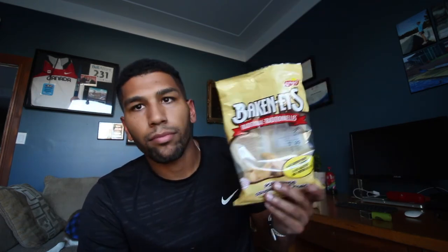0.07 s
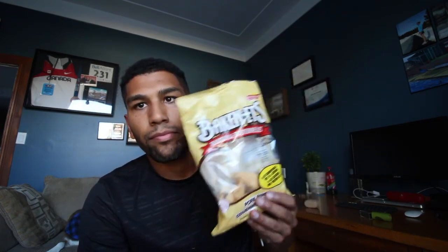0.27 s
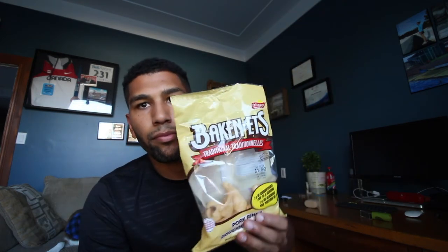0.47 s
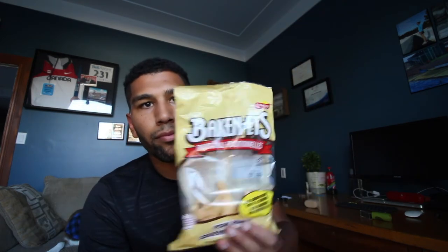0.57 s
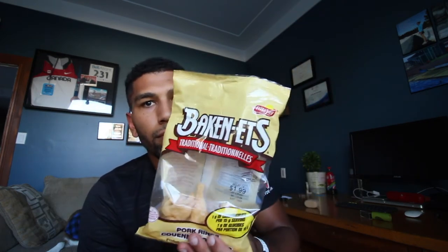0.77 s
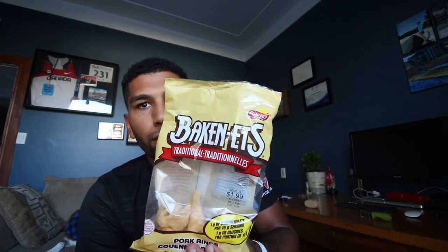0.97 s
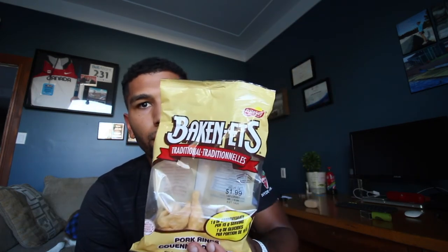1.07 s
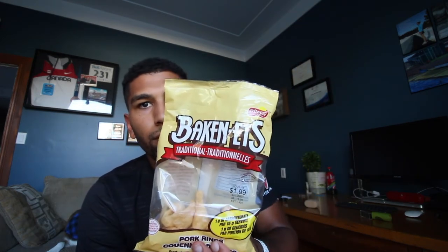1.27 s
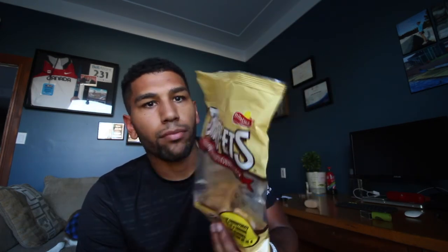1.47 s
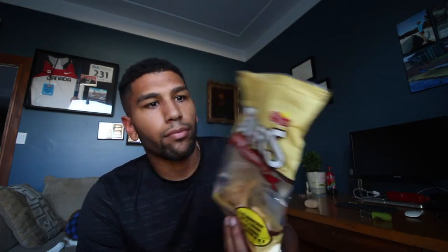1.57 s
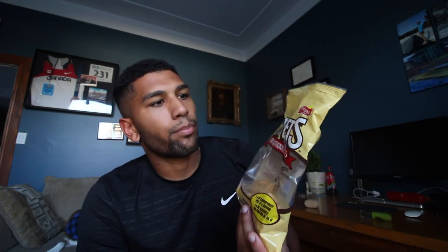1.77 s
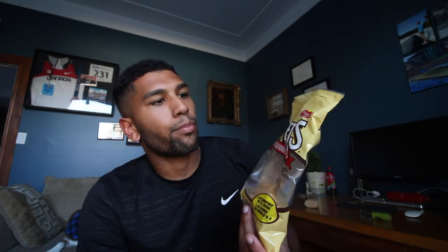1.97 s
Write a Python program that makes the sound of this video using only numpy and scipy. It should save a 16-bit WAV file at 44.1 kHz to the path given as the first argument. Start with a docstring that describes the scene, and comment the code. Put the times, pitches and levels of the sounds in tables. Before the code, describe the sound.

A plastic snack bag crinkles close by: irregular bright snaps and fine crackle from 0 to 0.7 s, strongest near 0.05, 0.27 and 0.5 s. A few sparse ticks follow, with a clear one at 0.94 s, then near quiet. From 1.39 s a dense crackling burst peaks around 1.5 s, with light contents shifting, continuing in snaps until 1.9 s. Short room reflections, faint low hum and hiss.

```python
"""Creases in a plastic snack bag snap over as it turns in the hand, near a camera in a quiet room. Each snap
sums a damped ring, a sharp bright crack, a dull thud of air and a flutter of noise. Scattered tiny pings make
the fine crackle, its finest grain and the shifting contents; three low pings are pieces dropping inside.
Near surfaces and a wall return delayed, duller snaps; decaying noise tails give the room's answer.
Under it lie a low hum with a narrow drone and the microphone's hiss, all shaped from noise."""
import sys
import numpy as np
from scipy import signal
from scipy.fft import rfft, irfft, next_fast_len
from scipy.io import wavfile

SR = 44100
rng = np.random.default_rng(int(sys.argv[2]) if len(sys.argv) > 2 else 0)


def to_wav(s):
    """Save 16-bit WAV."""
    ch = np.atleast_2d(s).T  # columns
    pcm = np.round(np.clip(ch, -1, 1) * 32767)  # PCM
    wavfile.write(sys.argv[1], SR, pcm.astype(np.int16))


N = 88288  # length of the scene in samples


def amp(db):
    """Turns dB into a pressure gain."""
    return 10 ** (np.asarray(db) / 20)


def unit(x):
    """Scales a sound to rms 1."""
    return x / np.sqrt(np.mean(x ** 2) + 1e-20)


def along(points, hz):
    """Reads (f/Hz, value) points on a logarithmic frequency axis."""
    f, value = np.transpose(points)
    return np.interp(np.log(hz + 1), np.log(f + 1), value)


def filtered(x, response):
    """Multiplies the spectrum of x by a response of frequency."""
    length = next_fast_len(N + SR // 2)
    hz = np.fft.rfftfreq(length, 1 / SR)
    return irfft(rfft(x, length) * response(hz), length)[..., :N]


def placed(start_s, rows):
    """Lays down short sounds, one per row, at their start times."""
    first = np.round(start_s * SR).astype(int)
    at = first[:, None] + np.arange(rows.shape[1])
    return np.bincount(at.ravel(), rows.ravel(), N + SR)[:N]


def pings(db, hz, cycles, size=512):
    """Damped sines that swell softly to an envelope peak of db and die within some cycles."""
    turns = hz[:, None] * np.arange(size) / SR
    age = turns / (np.reshape(cycles, (-1, 1)) / 5)
    envelope = (np.e * age / 2) ** 2 * np.exp(-age)  # peaks at 1 when age is 2
    return amp(db)[:, None] * envelope * np.sin(2 * np.pi * turns)


def shivers(count, life_s):
    """Rows of noise that start at once and die away, each of energy 1."""
    age = np.arange(512) / SR / life_s
    puff = rng.standard_normal((count, 512)) * np.sqrt(age) * np.exp(-age)
    return puff / np.linalg.norm(puff, axis=1, keepdims=True)


def band(db, rows, low_hz, top_hz):
    sos = signal.butter(3, [low_hz, top_hz], "band", fs=SR, output="sos")
    kept = signal.sosfilt(sos, rows)
    click = signal.sosfilt(sos, signal.unit_impulse(512))
    even = click * np.linalg.norm(rows, axis=1, keepdims=True)
    mean_peak = np.abs(kept).max(axis=1).mean()
    return amp(db)[:, None] * np.array([kept, even]) / mean_peak


def snaps():
    """Creases ring, push air, crack and shiver; gives the sound toward the camera and two feeds for the room."""
    # creases snapping over: (t/s, ring level/dB, ring f/Hz, ring life/cycles,
    # thud level/dB, crack level/dB, flutter level/dB)
    creases = [(0.038, -32, 3010, 1.8, -60, -28, -28), (0.0502, -8, 2720, 2.63, -46, -37.5, -16),
               (0.0586, -25, 2650, 0.83, -66, -26, -31), (0.066, -41, 1850, 2.3, -55, -45, -27),
               (0.0851, -17, 1820, 1.3, -37, -34.5, -25.5), (0.141, -54, 1740, 2.0, -49, -36.5, -61),
               (0.15, -34.5, 2460, 6.7, -56, -33.5, -41), (0.1541, -45, 1480, 1.3, -38, -42, -43),
               (0.1616, -23.5, 1220, 1.4, -37.5, -40, -29), (0.1945, -26, 2200, 2.3, -43, -40, -35.5),
               (0.2045, -49, 1940, 1.6, -49, -55, -62.5), (0.2205, -38, 2870, 2.7, -67, -31, -56),
               (0.2246, -37, 2350, 3, -59, -40, -45), (0.2291, -30, 1160, 0.78, -32.5, -47, -44),
               (0.2436, -28.5, 1200, 2.4, -34.5, -44, -32), (0.2496, -43, 2630, 2.8, -64, -37, -35),
               (0.2664, -2.5, 2330, 1.34, -35.5, -10.5, -18), (0.3315, -33, 1820, 2.1, -29, -34, -23.5),
               (0.363, -33, 2590, 2.3, -44.5, -41, -32), (0.3805, -32.5, 1160, 3, -63, -59, -36),
               (0.388, -38, 2200, 2.2, -50, -48, -60), (0.423, -44, 2540, 2.4, -56, -43, -43),
               (0.4297, -22, 2260, 0.7, -36.5, -34, -23.5), (0.4658, -22.5, 1250, 1.66, -54, -44, -32),
               (0.4748, -12.5, 2850, 4.6, -48, -16.5, -20), (0.5246, -16.5, 3030, 1.64, -31.5, -50, -23),
               (0.577, -43, 2170, 1.4, -32.5, -50, -30), (0.6105, -30, 1780, 0.67, -50, -49, -53),
               (0.625, -40, 2780, 3.1, -40, -47, -50.5), (0.6375, -33, 2370, 0.6, -42.5, -59, -49),
               (0.6737, -43, 3050, 2.4, -52, -56, -57), (0.6908, -52, 2000, 1.8, -53, -46, -48),
               (0.7788, -46.5, 940, 2.7, -49, -67, -72), (0.8306, -51.5, 1340, 3.8, -63, -65, -64.5),
               (0.889, -48, 2700, 1.2, -65, -64, -52), (0.9176, -30, 1650, 1.9, -44, -55, -39),
               (0.9376, -11.5, 3000, 2.6, -42, -42, -16), (1.3877, -19, 1440, 3.6, -46, -29, -16),
               (1.4154, -14, 3100, 3.9, -47, -43, -21), (1.4235, -39, 2060, 1.9, -29.5, -35, -39),
               (1.4281, -15.5, 2210, 1.4, -42, -44, -17), (1.4468, -48, 1910, 1.4, -41, -50, -45),
               (1.454, -24.5, 1375, 3.7, -38, -44, -32), (1.4687, -11.5, 2580, 2.6, -30, -17, -13),
               (1.491, -25, 2200, 3.7, -33, -47, -28), (1.4958, -22, 2130, 1.5, -40, -27, -17),
               (1.51, -21, 1880, 1.1, -28, -37, -32), (1.513, -15, 1630, 0.96, -27, -42, -27),
               (1.519, -14.5, 1890, 0.77, -52, -39, -25), (1.5609, -30, 1510, 1.3, -37, -53, -52),
               (1.585, -23.5, 2480, 2.4, -39, -52, -28.5), (1.598, -28.5, 2030, 1.3, -46, -32, -48),
               (1.6103, -34, 2100, 1.5, -51, -52, -36), (1.641, -45, 2270, 1.7, -58, -43, -51),
               (1.6604, -35, 1530, 1.3, -38, -40, -35.5), (1.6879, -30, 3180, 1.3, -43, -35.5, -38),
               (1.7004, -61, 2260, 1.9, -73, -54, -48.5), (1.7113, -14, 2730, 3.7, -35, -19, -19.5),
               (1.7209, -22, 2950, 3.1, -34, -29.5, -35), (1.7853, -15, 1820, 0.91, -34, -36, -24),
               (1.7887, -20.5, 2270, 1.5, -40, -38, -40), (1.8029, -24.5, 2950, 4.3, -50, -55, -47),
               (1.8197, -25.5, 1550, 0.82, -41, -56, -33), (1.823, -28, 1780, 1.3, -51, -56, -36),
               (1.85, -49, 2090, 3.5, -58, -45.5, -58), (1.8882, -34, 2700, 1.2, -64, -55, -54)]
    start_s, ring_db, ring_hz, ring_cycles, thud_db, crack_db, flutter_db = np.transpose(creases)
    count = len(start_s)

    ring = pings(ring_db, ring_hz, ring_cycles)
    thud_hz = 573 * np.exp(0.23 * rng.standard_normal(count))  # centre in Hz, log spread
    thud = pings(thud_db, thud_hz, cycles=1.92)

    # a sharp edge with a brief fizz of noise
    edge = signal.unit_impulse(512, idx=4) + shivers(count, life_s=0.00041)
    crack, even_crack = band(crack_db, edge, low_hz=4160, top_hz=12400)

    # the film shivers on after the snap
    shiver = shivers(count, life_s=0.0014)
    flutter, even_flutter = band(flutter_db, shiver, low_hz=914, top_hz=4024)

    rows = ring + thud + crack + flutter
    direct = placed(start_s, rows) + reflections(start_s, rows)
    # the room hears an even blend of all directions
    to_room_rings = placed(start_s, ring + even_crack)
    to_room_flutters = placed(start_s, thud + even_flutter)
    return np.array([direct, to_room_rings, to_room_flutters])


def reflections(start_s, rows):
    """Near surfaces and a wall return each snap late, with its treble softened."""
    # the wall's answer as the bag turns: (t/s, delay/s, level/dB)
    wall_answers = [(.27, 0.01, -12), (.47, .0106, -14), (.94, .0102, -27), (1.389, .0101, -19),
                    (1.469, 0.01, -12.5), (1.7, 0.0089, -24)]
    # answers of surfaces close to the bag: (delay/s, level/dB)
    near_answers = [(.0015, -17.5), (.0031, -23.5)]
    turn_s, delay_s, level_db = np.transpose(wall_answers)
    wall_delay_s = np.interp(start_s, turn_s, delay_s)
    wall_gain = amp(np.interp(start_s, turn_s, level_db))
    wall = placed(start_s + wall_delay_s, wall_gain[:, None] * rows)
    near = sum(amp(db) * placed(start_s + delay, rows) for delay, db in near_answers)
    top_hz = 4140  # corner of the gentle treble loss
    return filtered(near + wall, lambda hz: 1 / (1 + 1j * hz / top_hz))


def grains(level, hz, spread, cycles, sizes_db, count):
    """Scattered tiny pings of uneven pitch and size, brought to rms 1 and then put under a level curve."""
    when_s = rng.random(count) * N / SR
    colour, size = rng.standard_normal((count, 2)).T
    pitch_hz = np.clip(hz * np.exp(spread * colour), 150, SR / 3)
    dense = unit(placed(when_s, pings(sizes_db * size, pitch_hz, cycles, size=768)))
    return dense * amp(np.interp(np.arange(N) / SR, *np.transpose(level)))


def fine_crackle():
    """Thousands of tiny film pings: a middle-treble crackle and a brighter, finest grain."""
    # level of the fine crackle ahead of the bag's bass loss: (t/s, level/dB)
    crackle_level = [(0, -39.5), (.1, -43), (.2, -55), (.4, -59), (.45, -48.5), (.65, -54), (.75, -65.5),
                     (.9, -66), (1.0, -69), (1.38, -74), (1.42, -38.5), (1.52, -37.5), (1.62, -54.5),
                     (1.7, -50), (1.8, -40.5), (1.88, -58.5), (2, -70.5)]
    # level of the finest grain ahead of the bag's bass loss: (t/s, level/dB)
    fizz_level = [(0, -53.5), (.17, -59), (.22, -66.5), (.45, -63), (.7, -73), (1.38, -75), (1.42, -55),
                  (1.52, -61.5), (1.64, -69.5), (1.72, -54.5), (1.82, -68), (1.9, -76), (2, -77)]
    crackle = grains(crackle_level, hz=2500, spread=0.42, cycles=2.4, sizes_db=3, count=3500)
    fizz = grains(fizz_level, hz=8500, spread=0.4, cycles=2.2, sizes_db=2, count=7000)
    return crackle + fizz


def shifting_contents():
    """Contents shift in the bag as a scatter of low, short pings."""
    # level of the shifting contents ahead of the bag's bass loss: (t/s, level/dB)
    contents_level = [(0.0, -55.5), (0.1, -43.5), (0.22, -65), (0.23, -53.5), (0.42, -57), (0.43, -52),
                      (0.9, -62.5), (0.93, -50.5), (1.04, -67.5), (1.38, -66.5), (1.39, -51.5),
                      (1.52, -40.5), (1.63, -54.5), (1.79, -42.5), (1.88, -65), (2.0, -72)]
    return grains(contents_level, hz=396, spread=0.51, cycles=3.76, sizes_db=-0.5, count=600)


def dropping_pieces():
    """A piece drops inside the bag: a low ping that dies within two cycles."""
    # drops: (t/s, level/dB, f/Hz)
    piece_drops = [(0.02, -40.5, 230), (1.506, -43.5, 216), (1.686, -40.5, 141)]
    start_s, db, hz = np.transpose(piece_drops)
    return placed(start_s, pings(db, hz, cycles=1.68, size=4096))


def bag():
    """Snaps, crackle and contents lose bass, as so small a thing sends out little; the drops keep theirs."""
    rustle = fine_crackle() + shifting_contents()
    drops = dropping_pieces()
    direct, rings, flutters = snaps()
    low_hz = 179  # corner of the second-order high-pass
    film = filtered(np.array([direct + rustle, rings + rustle, flutters]),
                    lambda hz: (1j * hz / (low_hz + 1j * hz)) ** 2)
    return film[0] + drops, film[1] + drops, film[2]


def room(x):
    """Noise tails die at their own speed per frequency; each eighth second gets a new one as the bag moves."""
    # time for the tail to fall 60 dB: (f/Hz, t60/s)
    decay_times = [(200, 0.9), (1000, 0.26), (3000, 0.42), (7000, .2), (14000, 0.31)]
    # colour of the room's answer: (f/Hz, level/dB)
    tail_colour = [(200, -23), (1000, 5.3), (3000, -4.67), (6000, 1), (14000, -3.5)]
    rise_s = 0.0042
    out, piece = np.zeros(N + SR), SR // 8
    for start in range(0, N, piece):
        hz, t, bins = signal.stft(rng.standard_normal(SR // 2), SR, nperseg=256)
        decay = amp(-60 * t / along(decay_times, hz)[:, None])
        tail = signal.istft(bins * decay, SR, nperseg=256)[1]
        tail = tail * (1 - np.exp(-np.arange(len(tail)) / SR / rise_s))
        wet = signal.fftconvolve(x[start:start + piece], tail / np.linalg.norm(tail))
        out[start:start + len(wet)] += wet
    return filtered(out[:N], lambda hz: amp(along(tail_colour, hz)))


def noise(spectrum, channels):
    """White noise coloured by a spectrum and scaled to rms 1."""
    white = rng.standard_normal((channels, N))
    return unit(filtered(white, lambda hz: amp(along(spectrum, hz))))


def hum():
    """Low rumble of the house as coloured noise, with one narrow resonance of noise as a drone."""
    # relative spectrum of the rumble: (f/Hz, level/dB)
    hum_spectrum = [(15, -33), (25, 2), (130, 6), (184, -11), (406, -8), (525, -5), (575, -31),
                    (654, -11.5), (814, -8), (2000, -25), (2600, -69.5), (4400, -120)]
    rumble_db, drone_db = -63, -67
    drone_hz, width_hz = 73.4, 5.7
    drone = filtered(rng.standard_normal(N), lambda hz: 1 / (1 + ((hz - drone_hz) / width_hz) ** 2))
    return amp(rumble_db) * noise(hum_spectrum, channels=1)[0] + amp(drone_db) * unit(drone)


def hiss():
    """Each microphone port adds its own coloured noise."""
    # relative spectrum of the hiss: (f/Hz, level/dB)
    hiss_spectrum = [(30, 28), (300, 21), (1000, 6), (6000, 15.5), (15000, 17), (15800, 21), (16100, -27)]
    return amp(-67) * noise(hiss_spectrum, channels=2)


def scene():
    """Two close microphone ports hear the same sound; rings and flutters reach the room by their own paths."""
    direct, rings, flutters = bag()
    room_db = -10
    reverb = room(rings) + room(flutters)
    mid = direct + amp(room_db) * reverb + hum()
    return np.array([mid, mid])


def record(dry):
    """Adds the hiss of the ports; nothing is kept from the band limit up."""
    top_hz = 16800
    return filtered(dry + hiss(), lambda hz: hz < top_hz)


dry = scene()
out = record(dry)
to_wav(out)
```